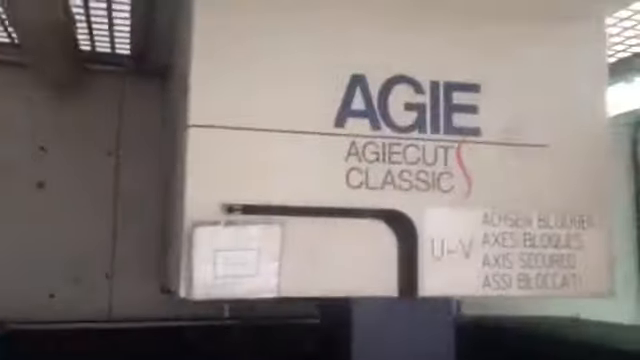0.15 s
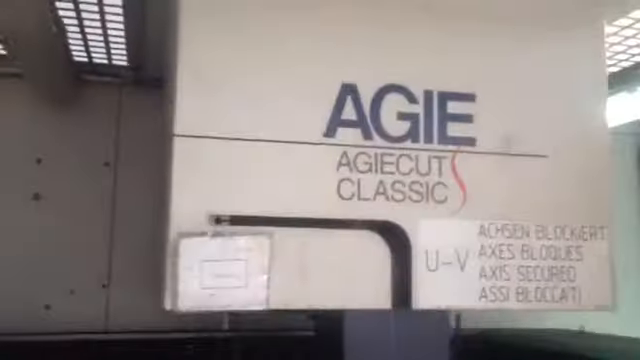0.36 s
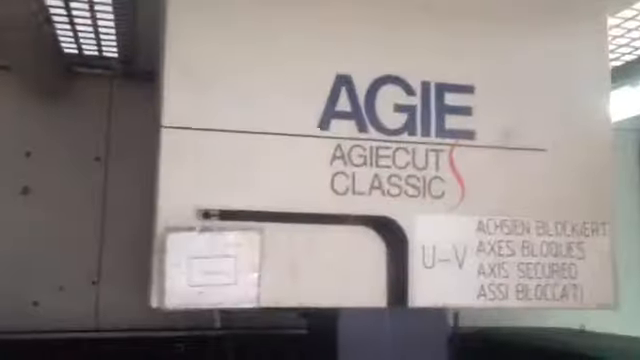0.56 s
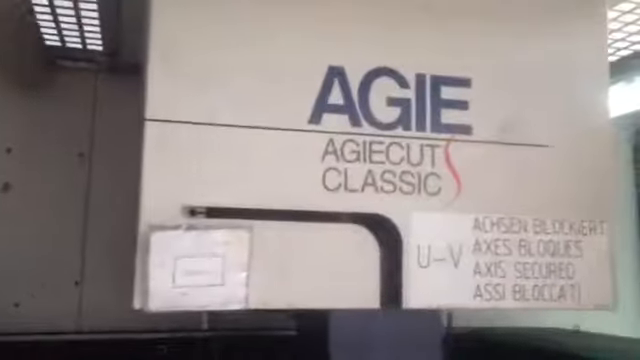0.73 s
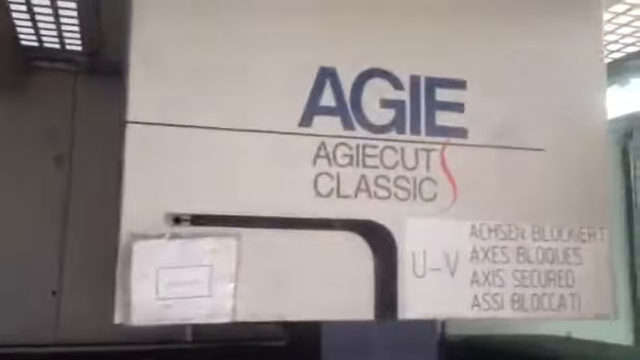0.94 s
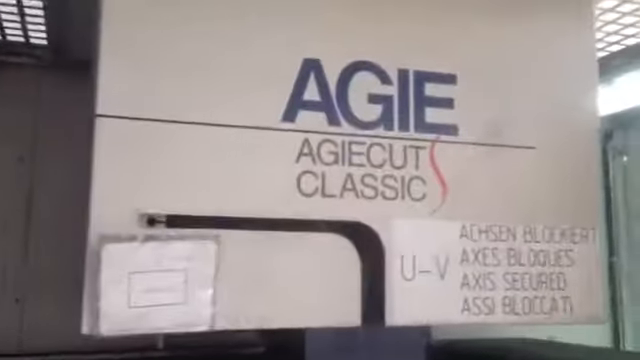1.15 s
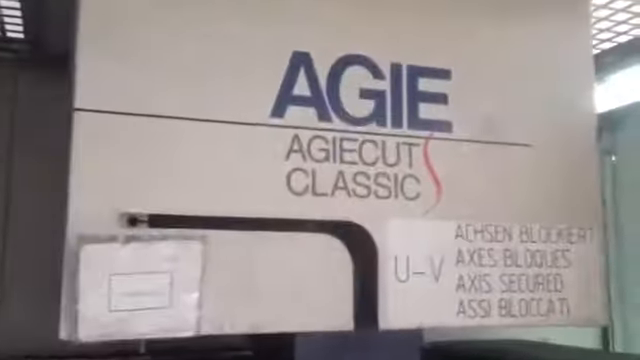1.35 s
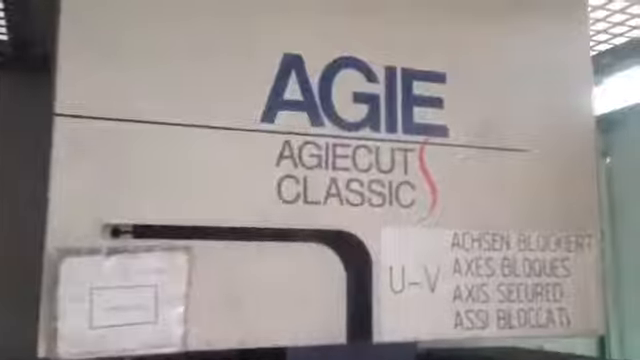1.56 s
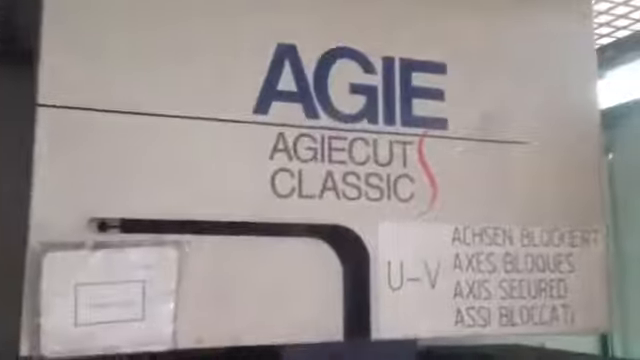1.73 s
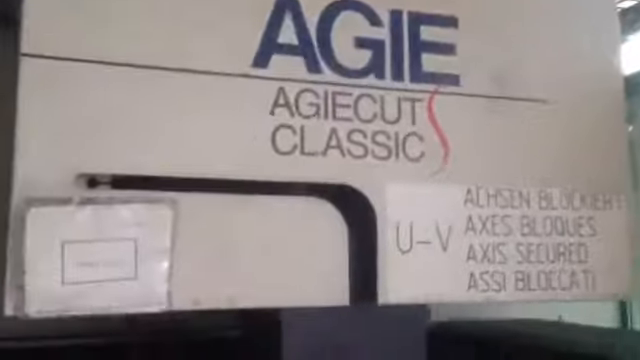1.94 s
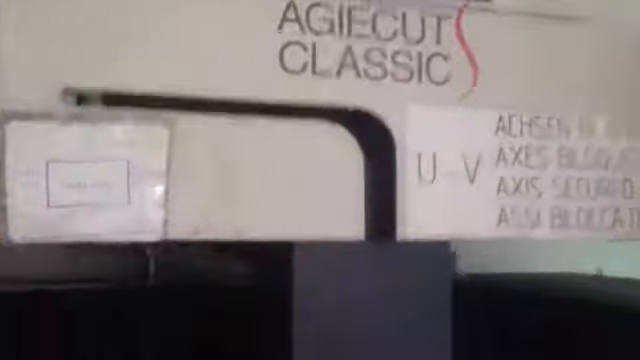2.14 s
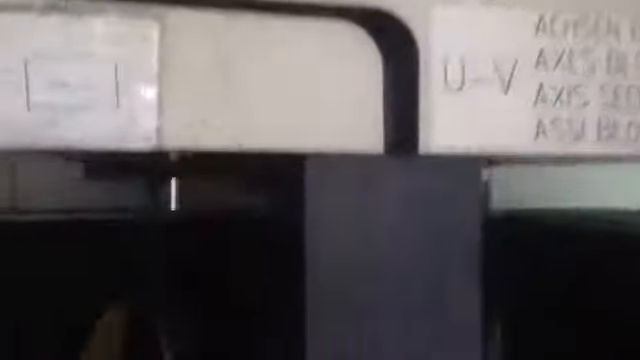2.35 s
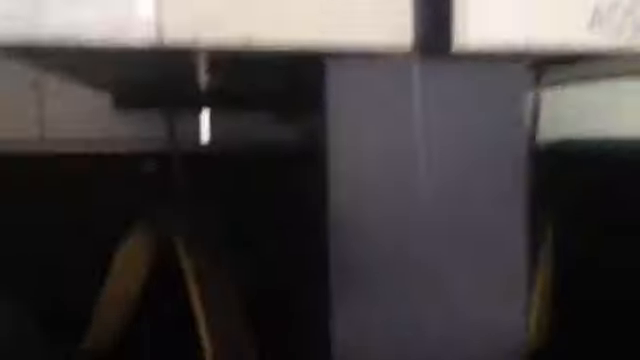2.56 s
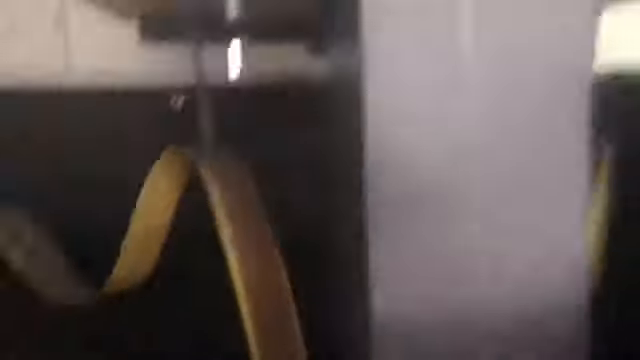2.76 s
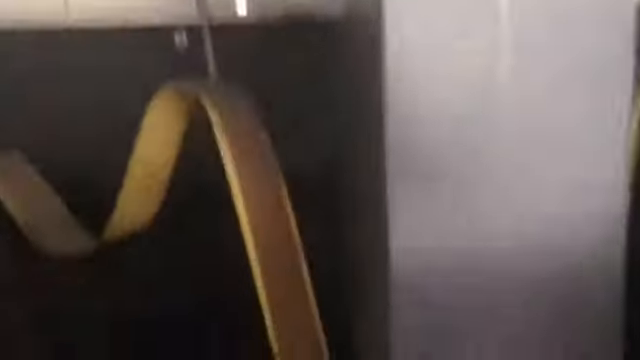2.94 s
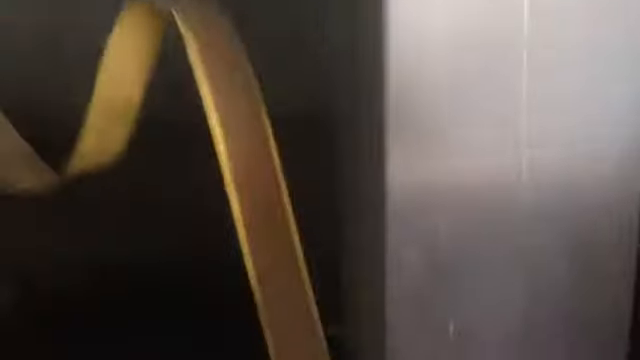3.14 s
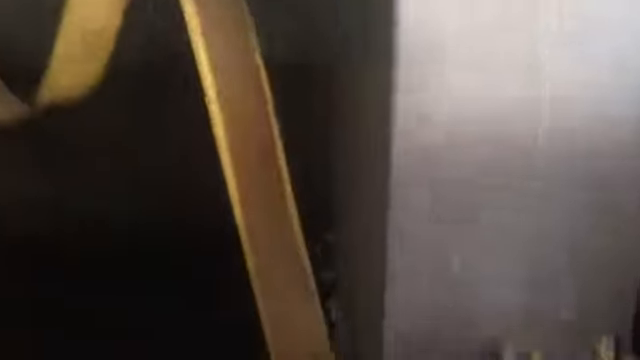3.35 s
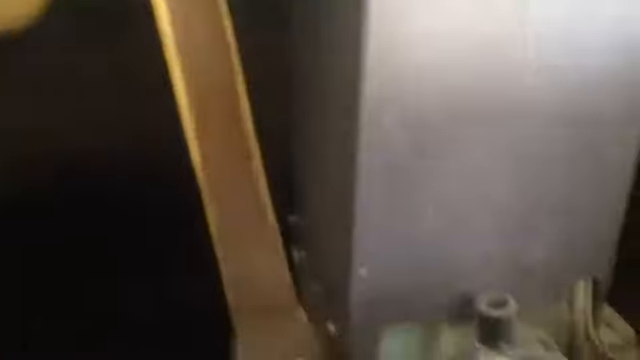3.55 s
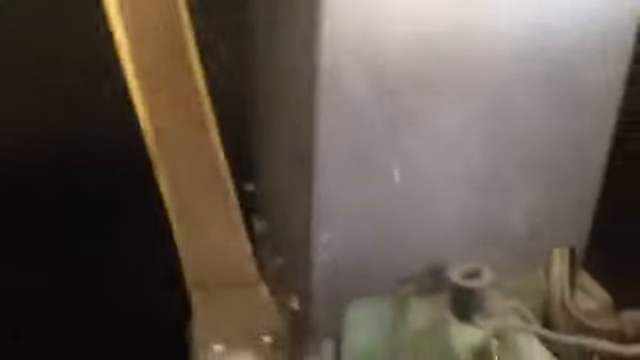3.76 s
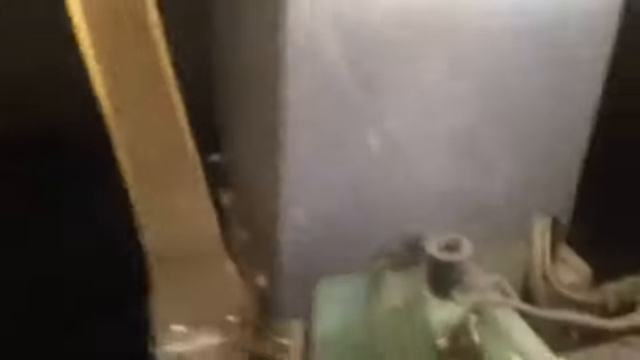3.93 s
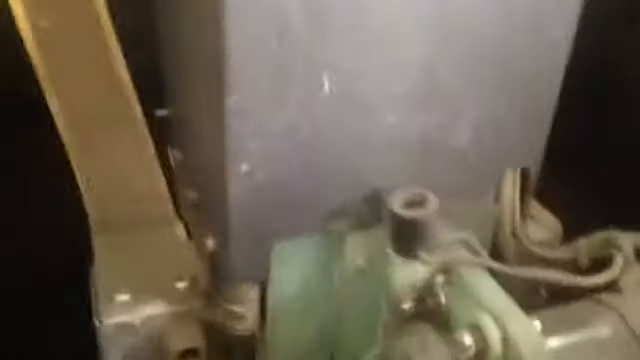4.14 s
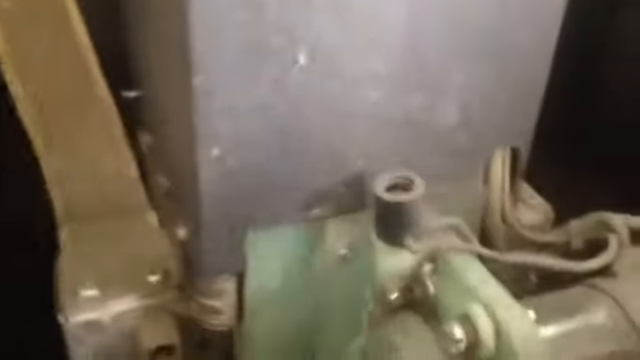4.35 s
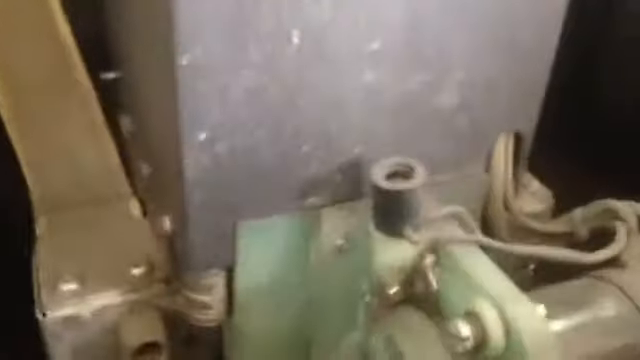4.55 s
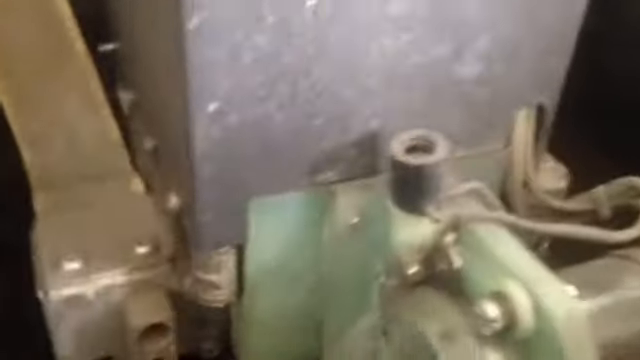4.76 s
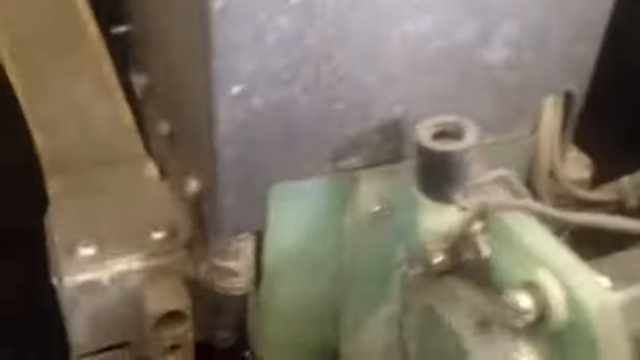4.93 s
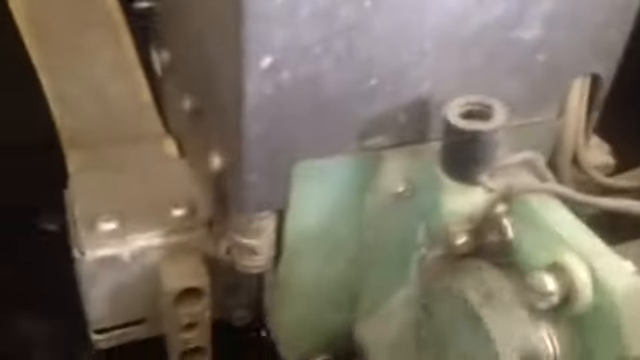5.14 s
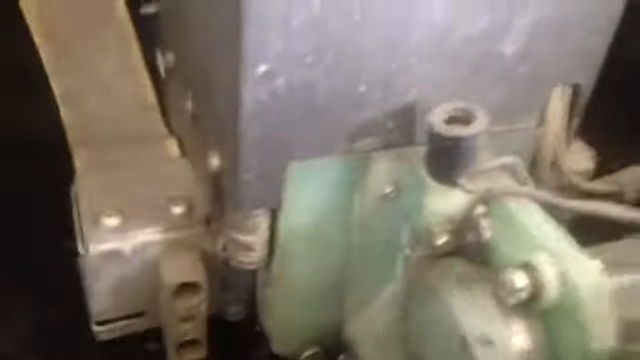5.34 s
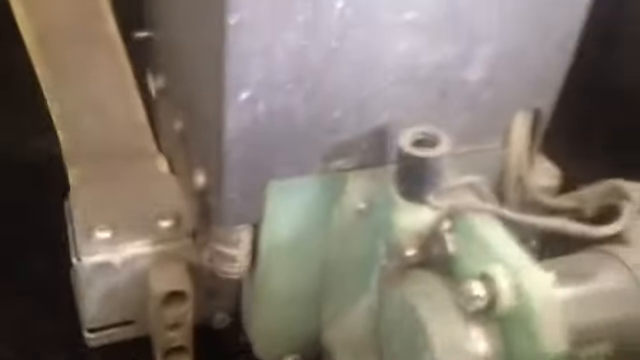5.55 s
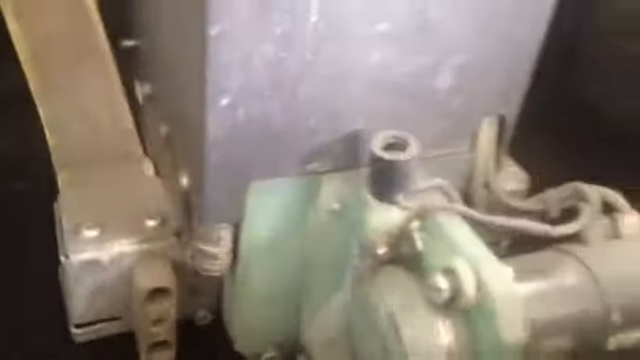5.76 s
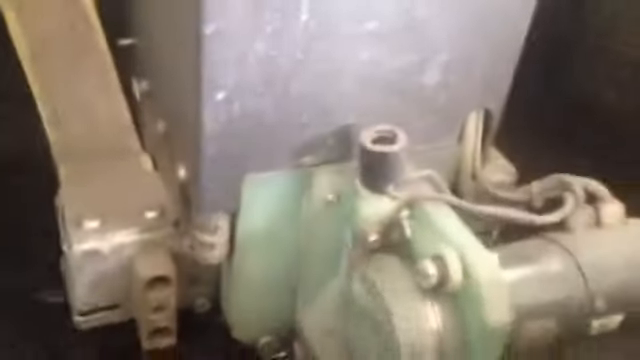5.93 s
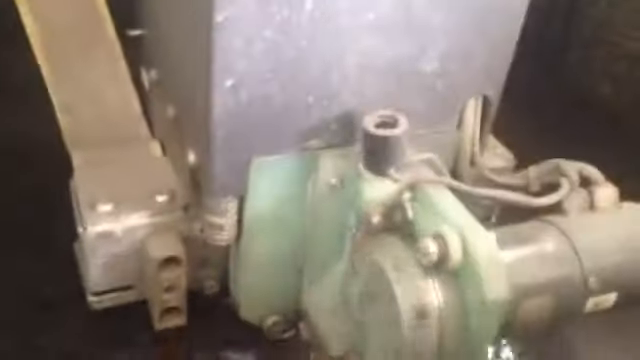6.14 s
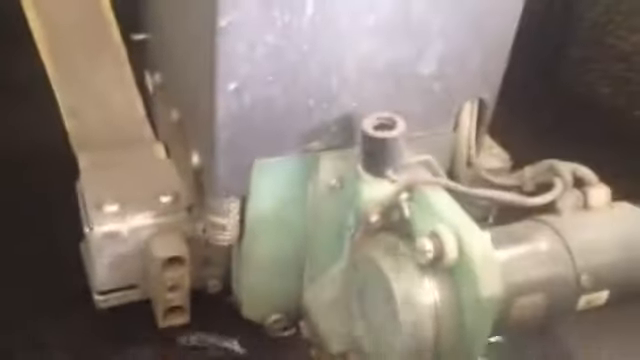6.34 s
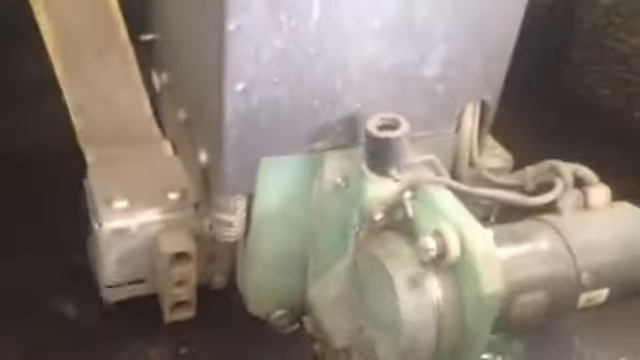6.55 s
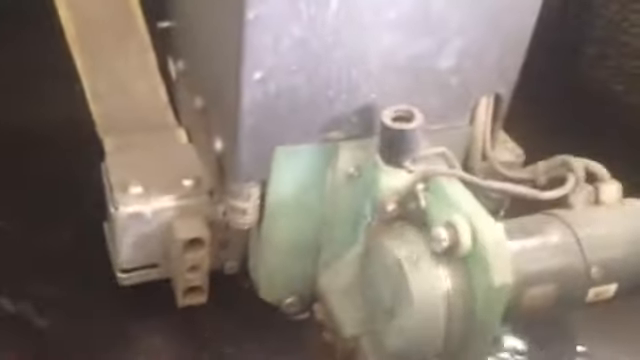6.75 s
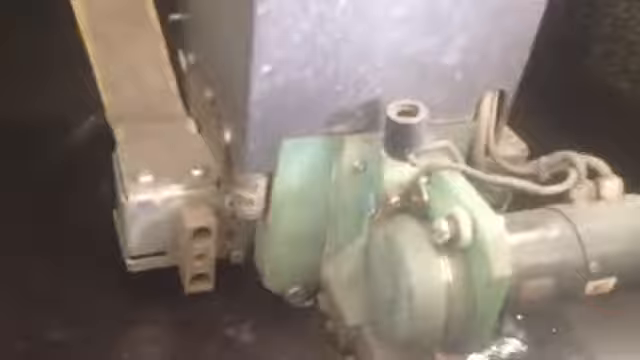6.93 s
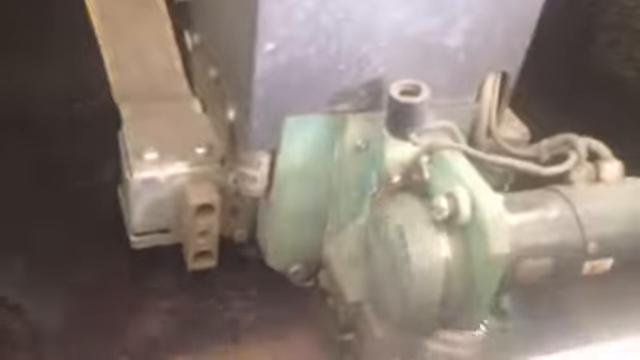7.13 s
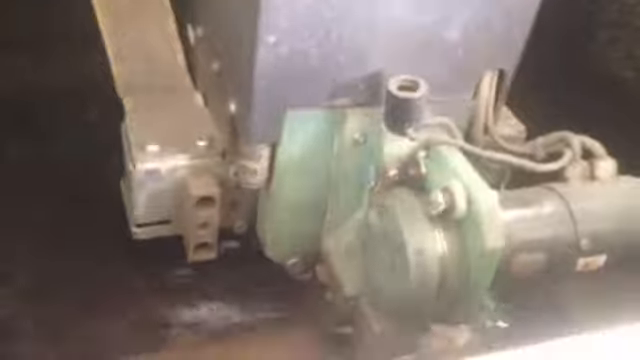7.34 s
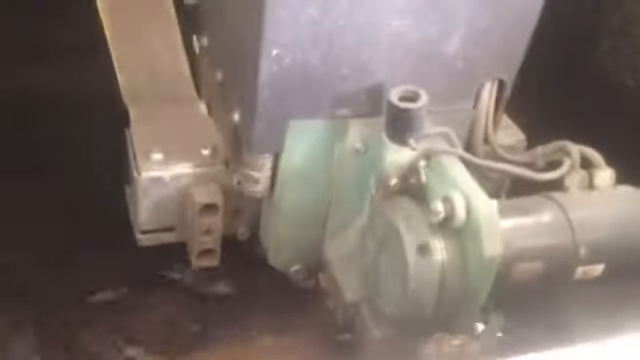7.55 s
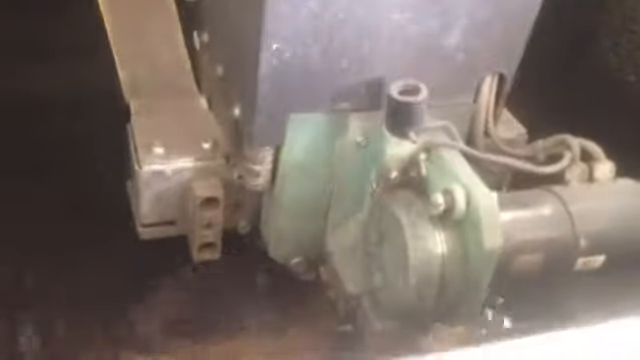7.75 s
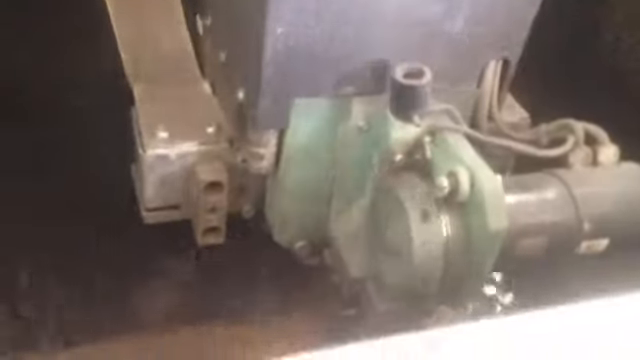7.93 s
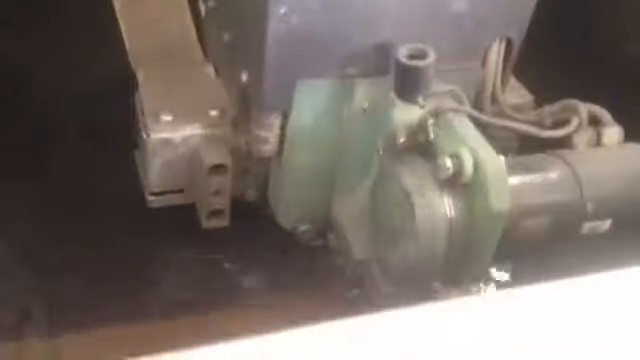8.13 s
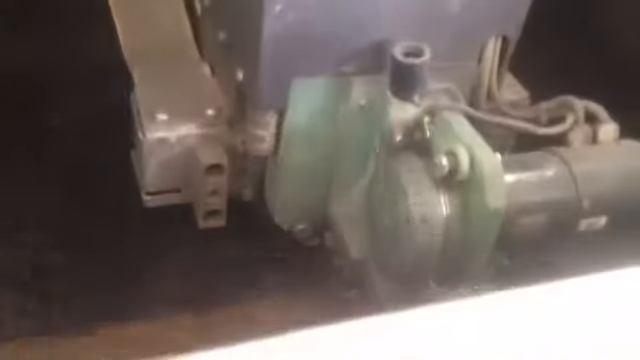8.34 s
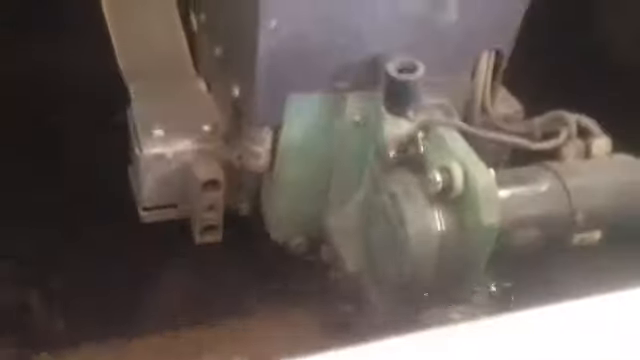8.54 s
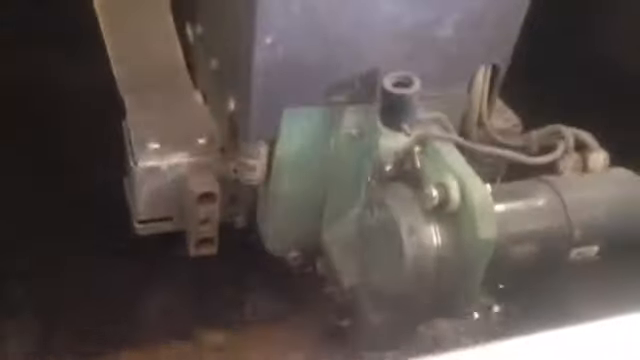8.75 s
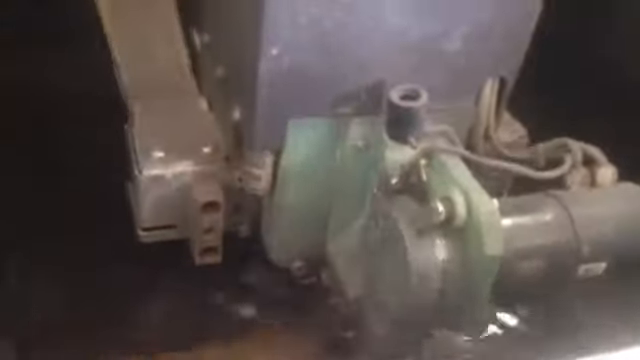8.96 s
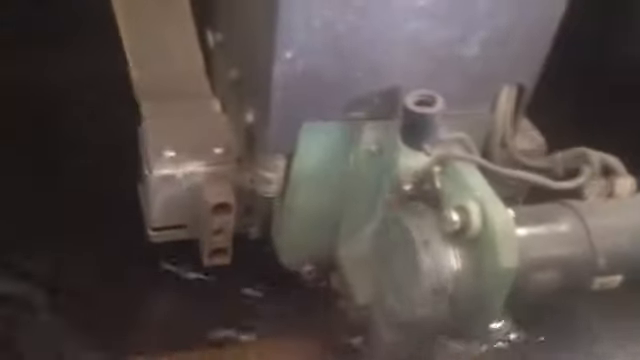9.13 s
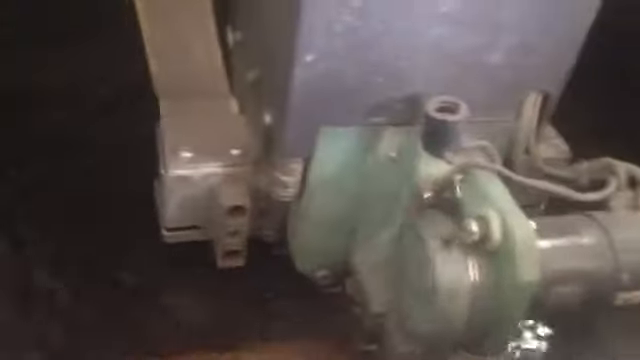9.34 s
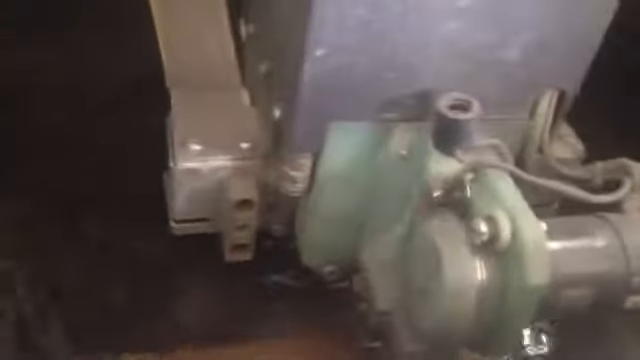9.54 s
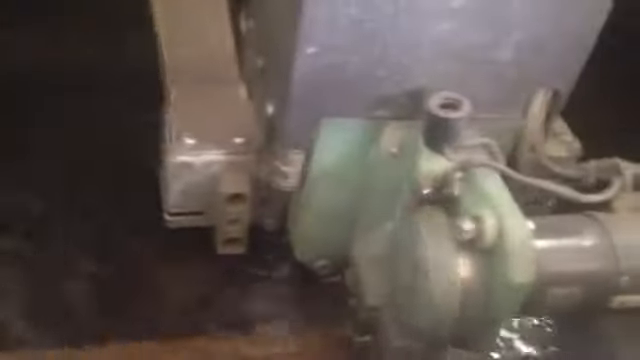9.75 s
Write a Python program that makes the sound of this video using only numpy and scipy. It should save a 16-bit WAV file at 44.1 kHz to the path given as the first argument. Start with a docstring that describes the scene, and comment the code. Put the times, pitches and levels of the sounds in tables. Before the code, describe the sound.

At 0 s a strong, broad hiss of compressed air holds for a moment and dies away by about 0.5 s. Behind it lie low fan rumble, rushing air, a thin buried whine and a subdued watery sizzle of countless sparks. A hand rubs the microphone housing dully around 0.6 s and bumps it at 0.9 s. From 2.3 s the microphone descends: a scraping rub at 2.6 s, soft bumps at 3.0 and 3.9 s, and fuller rumble. The sizzle grows, brightest with fine spray near 4.5 to 5.5 s. Short rough whistles poke out, notably at 3.6, 5.3 and 6.5 s. The discharge wavers, with tiny dropouts near 5.0, 5.9, 6.3 and 7.7 s. From 6.6 s a low pump hum rises, peaks near 7.25 s, and continues beneath the ringing sizzle, which strengthens slightly by the end at 9.8 s. Steel panels give short, close reflections.

```python
"""A wire spark-erosion machine cuts steel in a workshop: random sparks ring the wet gap, a dense sizzle
with short whistles and a finer spray, echoed by steel panels. The microphone moves from the machine's
head down to the cut, then over the water tank, where a pump hums as sine tones above the fans' noise.
Compressed air, a band of noise, hisses and dies away at the start; a hand bumps and rubs the housing."""
import sys
import numpy as np
from scipy import signal
from scipy.fft import rfft, irfft, next_fast_len
from scipy.io import wavfile
from scipy.ndimage import uniform_filter1d, map_coordinates

SR = 44100
rng = np.random.default_rng(int(sys.argv[2]) if len(sys.argv) > 2 else 0)


def dump(signal):
    """Clip the signal to [-1, 1] and save it as 16-bit WAV at the path in sys.argv[1]."""
    limited = np.clip(np.atleast_2d(signal).T, -1, 1)
    pcm = np.round(limited * 32767).astype(np.int16)
    wavfile.write(sys.argv[1], SR, pcm)


N = 431738  # length in samples


def amp(db):
    """Decibels to gain."""
    return 10 ** (np.asarray(db) / 20)


def unit(x):
    """x at rms 1."""
    return x / np.sqrt(np.mean(x ** 2) + 1e-20)


def steady(x, size=16384):
    """x at rms 1 over every stretch of size samples, so that slow level changes vanish."""
    return x / np.sqrt(np.abs(uniform_filter1d(x ** 2, size)) + 1e-20)


def curves(rows):
    """One value per sample for each column after the time."""
    s, *cols = np.transpose(rows)
    return [np.interp(np.arange(N) / SR, s, c) for c in cols]


def wobble(rate):
    """A smooth random curve, rate knots a second."""
    knots = rng.standard_normal(int(N * rate / SR) + 4)
    return map_coordinates(knots, [np.arange(N) * rate / SR])


def swell(s, length):
    """A smooth rise and fall around time s, 1 at its top and 0.14 at length seconds either side."""
    return np.exp(-2 * np.minimum(((np.arange(N) / SR - s) / length) ** 2, 20))


def chance_times(per_second, count=64):
    """Irregular moments within the scene (s)."""
    times = np.cumsum(rng.gamma(2, .5, count)) / per_second
    return times[times < N / SR]


def filtered(x, response):
    """x times a response of frequency."""
    m = next_fast_len(N + SR // 2)
    return irfft(rfft(x, m) * response(np.fft.rfftfreq(m, 1 / SR)), m)[:N]


def shape(points, hz):
    """Gain of (Hz, dB) points joined on a log axis."""
    f, db = np.transpose(points)
    return amp(np.interp(np.log(hz + 1), np.log(f + 1), db))


def rush(points):
    """Coloured noise of rms 1."""
    return unit(filtered(rng.standard_normal(N), lambda hz: shape(points, hz)))


def patchy(x, depth_db, band_size, frame_size):
    """x with random patches of gain in time and frequency."""
    z = signal.stft(x, nperseg=256)[2]
    field = rng.standard_normal(z.shape)
    for _ in range(2):
        field = uniform_filter1d(field, band_size, 0)
        field = uniform_filter1d(field, frame_size, 1)
    return signal.istft(z * amp(depth_db * unit(field)), nperseg=256)[1][:N]


def tone(hz, drift_hz, flutter_db):
    """A sine of rms 1 whose pitch and level can wander."""
    phase = 2 * np.pi * np.cumsum(hz + drift_hz * wobble(8)) / SR
    return unit(np.sin(phase) * amp(flutter_db * wobble(4.6)))


def burst(s, length, hz, width_hz):
    """A band of noise around hz that swells and fades around time s, rms 1 at its top."""
    t = np.arange(N) / SR
    near = np.flatnonzero(np.abs(t - s) < 2 * length)
    u = t[near] - t[near[0]]
    # two random curves steer the sine and cosine of the carrier
    knots = rng.standard_normal((2, 512))
    a, b = [map_coordinates(k, [u * width_hz], mode="wrap") for k in knots]
    carrier = unit(a * np.sin(2 * np.pi * hz * u) + b * np.cos(2 * np.pi * hz * u))
    out = np.zeros(N)
    out[near] = carrier * np.exp(-2 * ((t[near] - s) / length) ** 2)
    return out


# The microphone's way from the machine's head to the tank.
# Each row: time in seconds, place (0 head, 1 cut, 2 tank, fractions between).
MIC_PATH = [(2.2, 0), (2.7, 0.345), (3.7, 0.413), (4.7, 0.88), (5.4, 1.3), (6.7, 1.93), (9.79, 1.97)]


def mic_place():
    """Where the microphone is at each sample."""
    return curves(MIC_PATH)[0]


# Loudness of the cut at the microphone. Each row: time in seconds, level of its deep ring in dB.
CUT_LEVEL = [(0.5, -29), (0.9, -31.3), (1.3, -30.5), (2.3, -29), (2.55, -26.5), (3.05, -27), (3.45, -25.5),
             (3.6, -24.8), (4.2, -24), (4.75, -22.5), (5.65, -22.3), (6.8, -23.5), (7.65, -24.5),
             (9.0, -24), (9.6, -21.5)]


def cut_level_db():
    """The cut's level at each sample."""
    return curves(CUT_LEVEL)[0]


# Colour of the fans' rumble. Each row: frequency in Hz, relative level in dB per Hz.
RUMBLE_COLOUR = [(20, -25), (32, -16), (45, -16), (70, -5.5), (100, -1.5), (125, -2), (165, -6.5),
                 (230, -37), (400, -57)]
# Colour of the rushing air. Each row: frequency in Hz, relative level in dB per Hz.
FAN_AIR_COLOUR = [(100, -28), (170, -4), (215, 0.5), (270, -5.5), (320, 0), (375, -4.5), (460, -8.5),
                  (700, -10.5), (980, -9.5), (1120, -13.5), (1260, -11.5), (1500, -14), (3000, -20),
                  (10000, -35.5)]
# Blade tones. Each row: frequency in Hz, level in dB.
FAN_TONES = [(226, -50), (303, -45.5), (368, -50.5)]
# the machine's head shields the rumble; the shelter ends at place SHIELD_REACH
RUMBLE_DB, RUMBLE_SHIELD_DB, SHIELD_REACH = -38, -5, .35
# the rushing air sways slowly and grows towards the tank (dB per place)
FAN_AIR_DB, FAN_SWAY_DB, AIR_RISE_DB = -37, 0.34, 1.0


def fans():
    """Cooling fans: rumble, rushing air and a few wavering blade tones."""
    place = mic_place()
    shielded = np.clip(1 - place / SHIELD_REACH, 0, 1)
    rumble_db = RUMBLE_DB + RUMBLE_SHIELD_DB * shielded + 1.2 * wobble(3.07)
    air_db = FAN_AIR_DB + AIR_RISE_DB * place + FAN_SWAY_DB * wobble(2.02)
    blades = sum(amp(db) * tone(hz, drift_hz=2.4, flutter_db=3.5) for hz, db in FAN_TONES)
    return amp(rumble_db) * rush(RUMBLE_COLOUR) + amp(air_db) * rush(FAN_AIR_COLOUR) + blades


# Steady whine heard from each place. Entries: level in dB at the head, the cut and the tank.
WHINE_DB = [-57, -52, -61]
# Moments when the whine swells.
# Each row: centre in seconds, frequency in Hz, level in dB, half-length in seconds.
WHINE_SWELLS = [(2.2, 780, -51.5, .9), (3.096, 803, -46, 0.52), (6.25, 785, -46, 0.76)]
WHINE_HZ = 784


def whine():
    """A thin fan whine, a wandering sine mostly buried in the rushing air."""
    swells = np.zeros(N)
    for s, hz, db, length in WHINE_SWELLS:
        swells += amp(db) * swell(s, length) * tone(hz, drift_hz=2.8, flutter_db=2.0)
    level_db = np.interp(mic_place(), [0, 1, 2], WHINE_DB)
    return swells + amp(level_db) * tone(WHINE_HZ, drift_hz=5, flutter_db=4)


# The pump's hum at the microphone.
# Each row: time in seconds, level of the fundamental in dB, level of its octave in dB.
PUMP_LEVELS = [(0, -68, -58.5), (6.0, -61, -52), (6.6, -50, -41), (6.85, -41, -37), (7.25, -34, -34),
               (7.8, -38.5, -46.5), (8.65, -38, -43.5), (9.79, -39.5, -55)]
PUMP_HZ = 66.6


def pump():
    """The water pump's hum and its octave, strong over the tank."""
    low_db, octave_db = curves(PUMP_LEVELS)
    low = amp(low_db) * tone(PUMP_HZ, drift_hz=.3, flutter_db=0.0)
    octave = amp(octave_db) * tone(2 * PUMP_HZ, drift_hz=0.81, flutter_db=0.2)
    return low + octave


# Colour of the compressed air. Each row: frequency in Hz, relative level in dB per Hz.
AIR_COLOUR = [(240, -44), (400, -30), (520, -7.5), (589, -8), (1010, -7.5), (1950, -13.5), (2540, 0.5),
              (2870, -9.5), (3300, -2.5), (6400, -2), (9540, -10.5), (10800, -19.5), (14000, -53),
              (22000, -120)]
# the blast holds, then dies away ever faster as the pressure runs out
AIR_DB, AIR_HOLD_S, AIR_FALL_DB_PER_S, AIR_FALL_DB_PER_S2 = -18, 0.12, 65, 19


def air_blast():
    """Compressed air hisses as patchy noise and runs out."""
    falling_s = np.maximum(np.arange(N) / SR - AIR_HOLD_S, 0)
    air_db = AIR_DB - AIR_FALL_DB_PER_S * falling_s - AIR_FALL_DB_PER_S2 * falling_s ** 2
    hiss = patchy(rush(AIR_COLOUR), depth_db=2.0, band_size=4, frame_size=10)
    return amp(air_db) * unit(hiss)


# Soft bumps of the hand on the microphone's housing. Each row: centre in seconds, level in dB.
BUMPS = [(0.941, -31), (2.976, -27), (3.93, -30)]
# Rubs of the hand on the housing. Each row: centre in seconds, level of the dull rub in dB,
# half-length in seconds, scrape against the dull rub in dB.
RUBS = [(0.644, -33.5, 0.4, -11.5), (2.625, -36, 0.28, -2)]
# Colour of the dull rub. Each row: frequency in Hz, relative level in dB per Hz.
RUB_COLOUR = [(25, -22), (60, -10), (130, -6.5), (200, 1), (245, -4.5), (300, -16), (600, -43)]
# Colour of the scrape. Each row: frequency in Hz, relative level in dB per Hz.
SCRAPE_COLOUR = [(250, -25), (450, -5), (650, -1), (1200, -4.5), (2500, -25), (8000, -57)]


def handling():
    """Dull bumps and scraping rubs, short swells of noise carried through the housing."""
    bumps = sum(amp(db) * burst(s, length=0.0176, hz=85, width_hz=100) for s, db in BUMPS)
    rub, scrape = rush(RUB_COLOUR), rush(SCRAPE_COLOUR)
    rubs = np.zeros(N)
    for s, db, length, scrape_db in RUBS:
        rubs += amp(db) * swell(s, length) * (rub + amp(scrape_db) * scrape)
    return bumps + rubs


# The loudest whistles. Each row: centre in seconds, frequency in Hz, level in dB, half-length in seconds.
LOUD_WHISTLES = [(0.027, 2390, -25, .06), (0.276, 2700, -31.5, .15), (1.07, 2436, -33, .17),
                 (1.56, 2430, -30.5, .13), (2.15, 2720, -31, .08), (3.36, 2350, -30, .1),
                 (3.602, 2700, -21.5, .07), (3.62, 2315, -26, .1), (3.85, 2690, -26, .07),
                 (4.0, 2320, -27, .05), (4.133, 2660, -26, .04), (4.505, 2670, -25, .07),
                 (4.95, 1970, -28, .12), (5.28, 1834, -23.5, .08), (6.515, 2660, -20, .022),
                 (7.283, 2500, -29, .07)]
# Resonances that whistle at random. Each row: frequencies in Hz, for the head, the cut and the tank in turn.
WHISTLE_HZ = [(2440, 2690), (1880, 1975), (2400, 2650)]
# random whistles lie WHISTLE_DB against the level of the cut; WHISTLE_S is their half-length
WHISTLES_PER_S, WHISTLE_DB, WHISTLE_SCATTER_DB, WHISTLE_S = 1.5, -8.5, 2, .08
WHISTLE_WIDTH_HZ = 75


def singing():
    """Now and then the sparks drive one resonance of the gap into a short, rough whistle."""
    level_db = cut_level_db()
    place = mic_place()
    whistles = list(LOUD_WHISTLES)
    for s in chance_times(WHISTLES_PER_S):
        now = int(s * SR)
        hz = rng.choice(WHISTLE_HZ[round(np.clip(place[now], 0, 2))])
        db = level_db[now] + WHISTLE_DB + WHISTLE_SCATTER_DB * rng.standard_normal()
        whistles.append((s, hz, db, WHISTLE_S))
    return sum(amp(db) * burst(s, length, hz, WHISTLE_WIDTH_HZ) for s, hz, db, length in whistles)


def sparks(per_second, scatter_db):
    """Irregular discharges: clicks of random sign and scattered size."""
    fired = rng.random(N) < per_second / SR
    return unit(fired * rng.choice([-1, 1], N) * amp(scatter_db * rng.standard_normal(N)))


def ring(colour, modes, edge_hz, size=8192):
    """The causal ring of one spark: a broad colour with resonances on top, dull above the edge."""
    hz = np.fft.rfftfreq(size, 1 / SR)
    power = 1
    for f, width, db in modes:
        power = power + amp(db) ** 2 / (1 + ((hz - f) / (width / 2)) ** 2) ** 2
    gain = shape(colour, hz) * np.sqrt(power) / np.sqrt(1 + (hz / edge_hz) ** 10)
    # folding the cepstrum gives minimum phase: the ring starts at once
    cepstrum = irfft(np.log(np.maximum(gain, 1e-6)))
    cepstrum[1:size // 2] *= 2
    cepstrum[size // 2 + 1:] = 0
    return irfft(np.exp(rfft(cepstrum)))


def drifting(x, drift, rate):
    """x with all its resonances wandering by the share drift, as the bubbles in the water come and go."""
    lag = np.cumsum(drift * wobble(rate))
    return map_coordinates(x, [np.arange(N) + lag], mode="mirror")


def panels(x, echo_db, sway_s, count=8):
    """Steel panels close by echo the sound; the delays wander slightly at random."""
    n = np.arange(N)
    delays_s = rng.uniform(0.000994, .008, count)
    echoes = sum(np.interp(n - (delay + sway_s * wobble(0.591)) * SR, n, x) for delay in delays_s)
    return (x + amp(echo_db) * echoes) / np.sqrt(1 + count * amp(echo_db) ** 2)


# The strongest stalls and flares of the discharge.
# Each row: centre in seconds, level change in dB, half-length in seconds.
LURCHES = [(0.88, -4.5, .06), (3.46, -3, .037), (4.997, -8, .012), (5.935, -4.5, .04), (6.003, 2.5, .03),
           (6.314, -5.5, .028), (6.81, -4, 0.017), (7.679, -7, 0.024), (9.287, 3, 0.038),
           (9.336, -5.5, 0.014)]
# the discharge wavers quickly and slowly, and stalls at random
WAVER_DB, SWELL_DB = 0.65, 0.2
STALLS_PER_S, STALL_DB, STALL_S = 1.2, -2.5, 0.021


def surge_db():
    """The discharge wavers all the time and now and then stalls or flares for a moment."""
    stalls = [(s, STALL_DB, STALL_S) for s in chance_times(STALLS_PER_S)]
    lurches = sum(db * swell(s, length) for s, db, length in LURCHES + stalls)
    return lurches + WAVER_DB * wobble(85) + SWELL_DB * wobble(11)


# Colour of the sparks from the head, the cut and over the tank.
# Each row: frequency in Hz, relative level in dB per Hz.
AT_HEAD = [(650, -58.5), (1100, -26), (1690, -12.5), (2010, -6.5), (2190, -6.5), (2340, -4), (2480, -8.5),
           (2810, -10), (3090, -9.5), (3740, -12.5), (4070, -12), (5690, -19.5), (7880, -38), (10800, -41),
           (14000, -65), (22000, -120)]
AT_CUT = [(650, -54.5), (1100, -34.5), (1200, -17), (1450, -15.5), (1710, -6), (1950, -4), (2390, -8.5),
          (2530, -7), (2940, -9.5), (3500, -2.5), (4890, -12), (7090, -7.5), (9180, -27), (10800, -37),
          (14000, -72), (22000, -120)]
AT_TANK = [(650, -35), (1100, -18.5), (1440, -14.5), (1550, -10.5), (1640, -12), (1910, -4), (2390, -4),
           (2600, -3.5), (2830, -8.5), (3060, -5), (3630, -2.5), (5580, -14), (9090, -33.5), (10800, -37),
           (14000, -64), (22000, -120)]
# Resonances of the wet gap and the tank that stand out at each place.
# Each row: frequency in Hz, width in Hz, level against the broad colour in dB.
HEAD_MODES = [(2416, 48, 8.5), (2690, 104, 10.5), (3360, 95, 7), (3600, 63, 5), (3820, 50, 7)]
CUT_MODES = [(1580, 20, -2), (1735, 53, 1), (1973, 45, 1), (2560, 50, -4), (2670, 73, -2), (3120, 50, 0),
             (3630, 140, 2), (3940, 160, 0)]
TANK_MODES = [(1568, 22, 6.5), (1728, 30, 8.5), (1880, 33, 9.5), (1970, 27, 5.5), (2137, 46, 7.5),
              (2320, 22, -2), (2540, 26, 8.5), (2666, 54, 8.5), (2975, 42, 6), (3173, 26, 7.5),
              (3376, 75, 6), (3515, 40, 4), (3740, 30, 8), (3970, 40, -8), (4320, 19, 6), (4470, 45, 7)]
# Bright sizzle against the deep ring. Entries: level in dB at the head, the cut and the tank.
BRIGHT_DB = [-7, -4, -5]
SPLIT_HZ = 3086  # above this the sizzle counts as bright


def gap_sizzle(place):
    """Sparks ring the water-filled gap, heard from three places blended as the microphone moves."""
    train = patchy(sparks(per_second=6000, scatter_db=2.0), depth_db=2.0, band_size=2, frame_size=7)
    views = [(AT_HEAD, HEAD_MODES), (AT_CUT, CUT_MODES), (AT_TANK, TANK_MODES)]
    sizzle = np.zeros(N)
    for k, (colour, modes) in enumerate(views):
        share = np.maximum(1 - np.abs(place - k), 0)
        sizzle += share * unit(signal.fftconvolve(train, ring(colour, modes, edge_hz=5800))[:N])
    drift = np.interp(place, [0, 1, 2], [.009, .008, .003])
    sizzle = panels(drifting(sizzle, drift, rate=5), echo_db=-18.5, sway_s=0.00017)
    # the deep ring bends round the machine's parts; the bright sizzle needs a free path
    deep = filtered(sizzle, lambda hz: 1 / (1 + (hz / SPLIT_HZ) ** 20))
    bright_db = np.interp(place, [0, 1, 2], BRIGHT_DB) + .7 * wobble(6)
    return steady(deep) + amp(bright_db) * steady(sizzle - deep)


# Colour of the fine spray. Each row: frequency in Hz, relative level in dB per Hz.
SPRAY_COLOUR = [(2940, -20.5), (5000, -5.5), (6430, -0.5), (7900, -2.5), (9930, -9), (10600, -19.5),
                (10800, -58), (14000, -60), (22000, -120)]


def spray_fizz():
    """Denser, more scattered discharges fizz as a fine spray above the gap, rms 1."""
    fizz = patchy(sparks(per_second=12000, scatter_db=4.0), depth_db=1.67, band_size=5, frame_size=8)
    coloured = filtered(fizz, lambda hz: shape(SPRAY_COLOUR, hz))
    return unit(panels(coloured, echo_db=-16.5, sway_s=.0001))


# Fine spray against the deep ring, before the beam. Entries: level in dB at the head, the cut and the tank.
SPRAY_DB = [-14.5, -16.5, -15.5]
# the spray beams out of the gap towards one place (width in places)
SPRAY_BEAM_DB, BEAM_PLACE, BEAM_WIDTH = 6, 0.98, 0.31


def cutting():
    """Sizzle and spray of the cut, both surging with the discharge, the spray less so."""
    place = mic_place()
    surge = surge_db()
    beam = np.exp(-((place - BEAM_PLACE) / BEAM_WIDTH) ** 2)
    spray_db = np.interp(place, [0, 1, 2], SPRAY_DB) + SPRAY_BEAM_DB * beam + 0.31 * surge
    sizzle = amp(surge) * gap_sizzle(place)
    return amp(cut_level_db()) * (sizzle + amp(spray_db) * spray_fizz())


def scene():
    """All sources at one microphone."""
    background = fans() + whine() + pump()
    return (background + air_blast() + handling() + singing() + cutting())[None]


def record(dry):
    """The recorder keeps nothing above its band limit."""
    top_hz = 10750
    return filtered(dry[0], lambda hz: hz < top_hz)[None]


dry = scene()
out = record(dry)
dump(out)
```